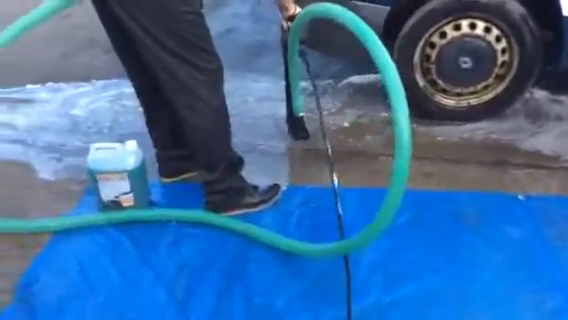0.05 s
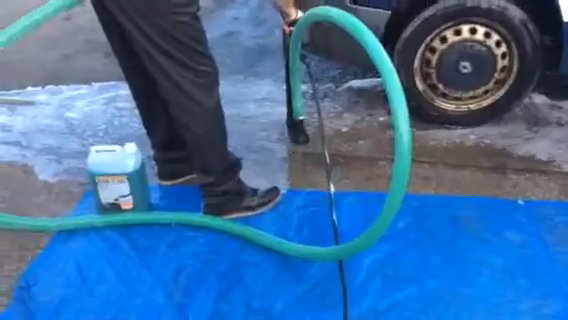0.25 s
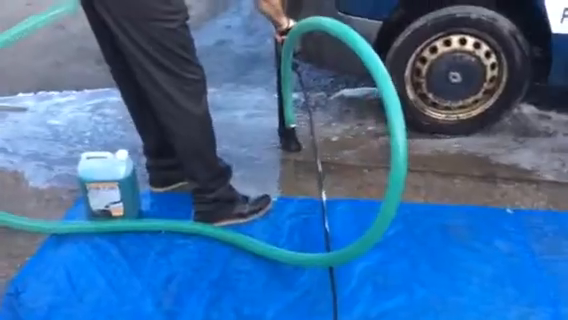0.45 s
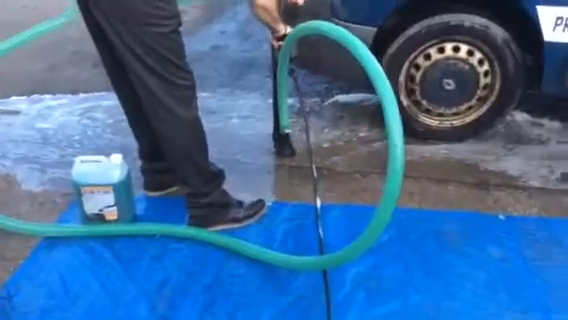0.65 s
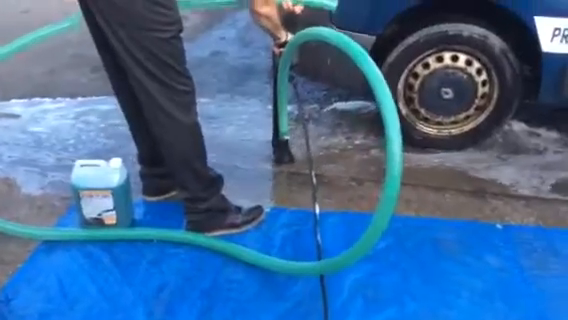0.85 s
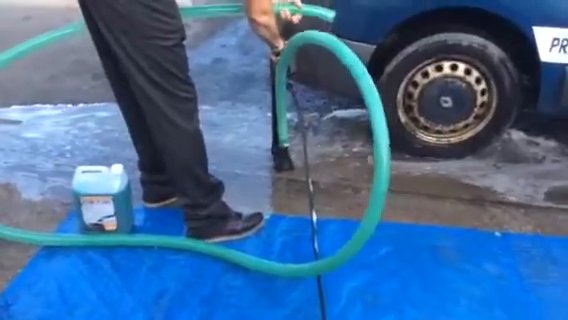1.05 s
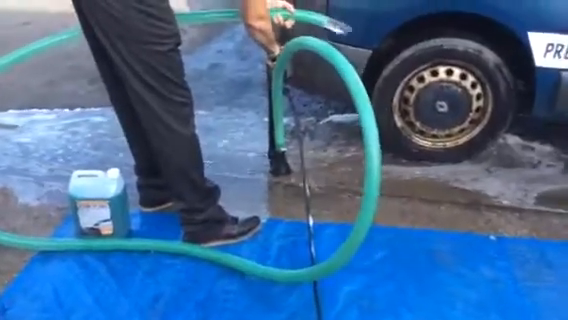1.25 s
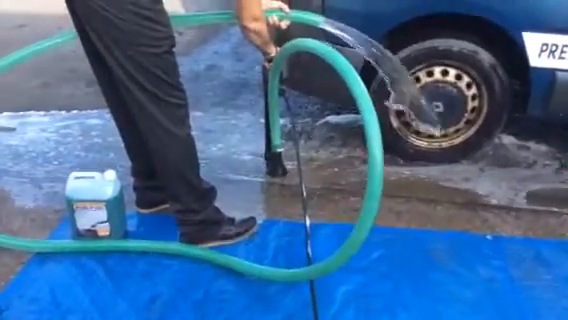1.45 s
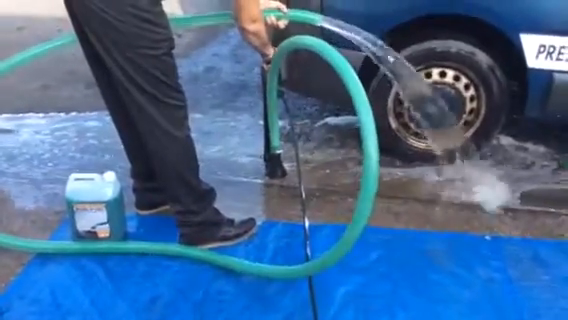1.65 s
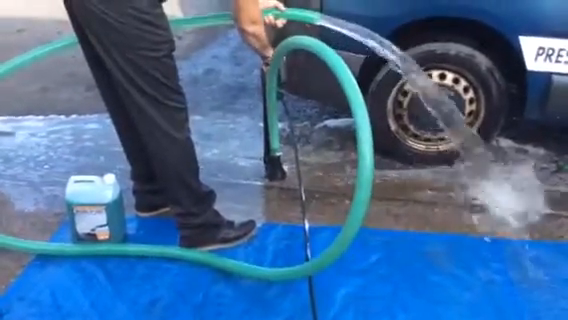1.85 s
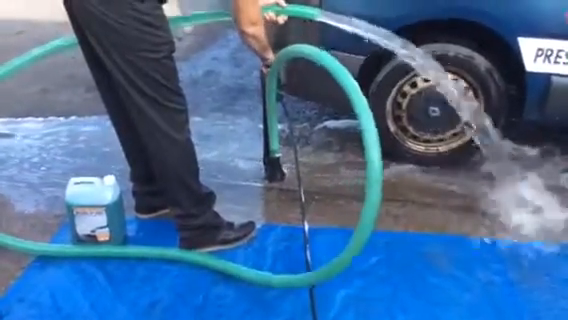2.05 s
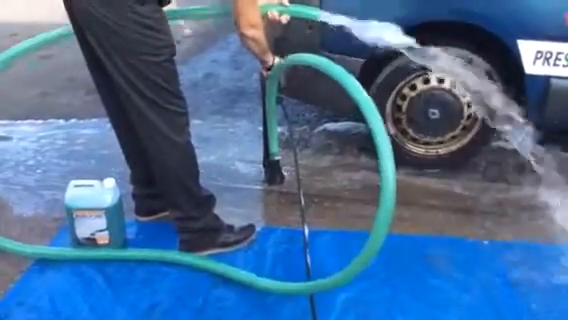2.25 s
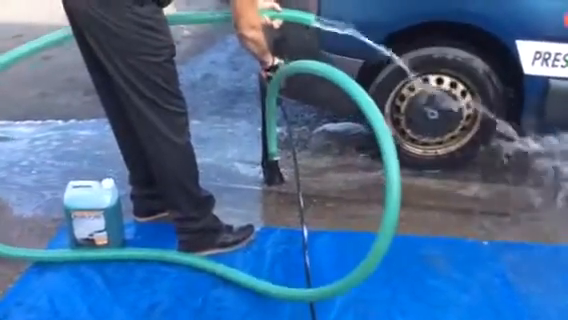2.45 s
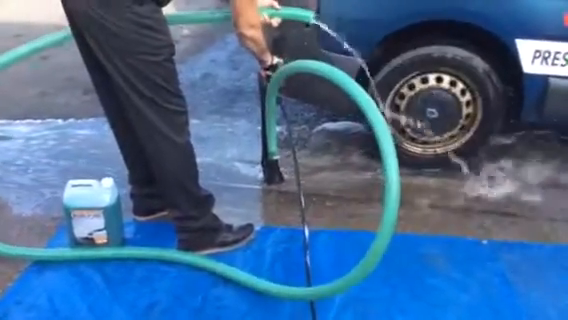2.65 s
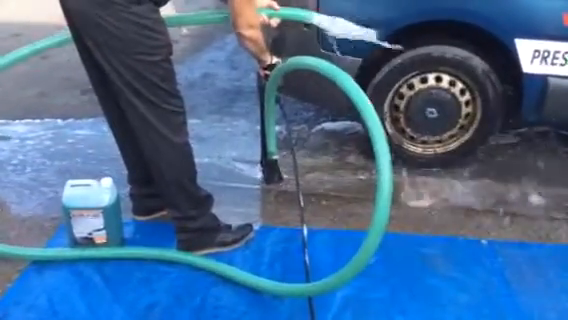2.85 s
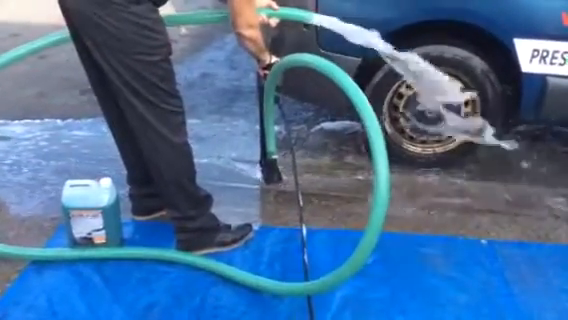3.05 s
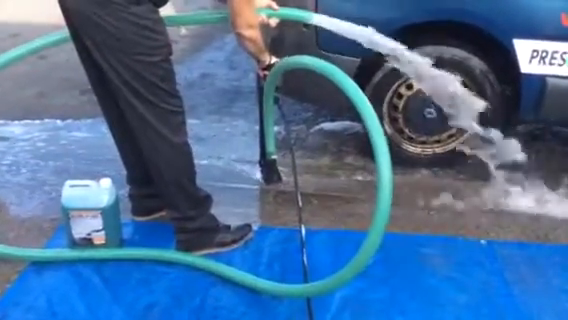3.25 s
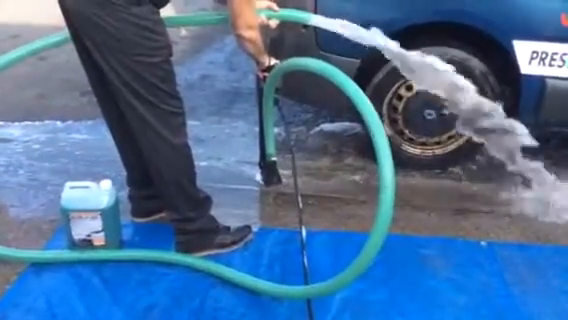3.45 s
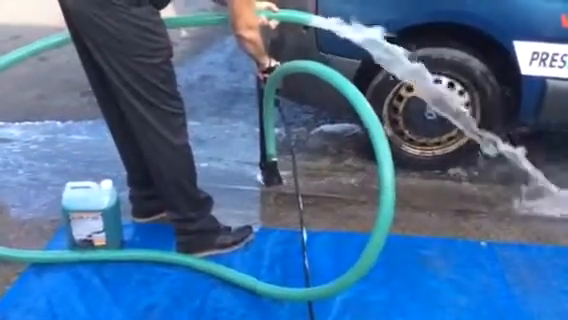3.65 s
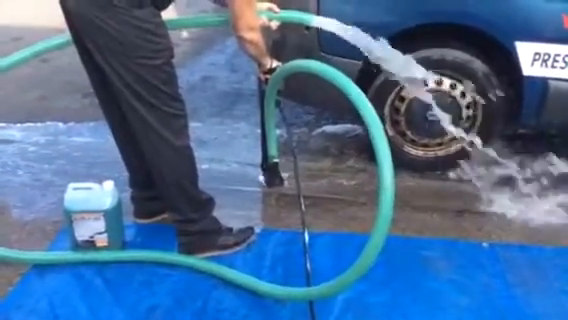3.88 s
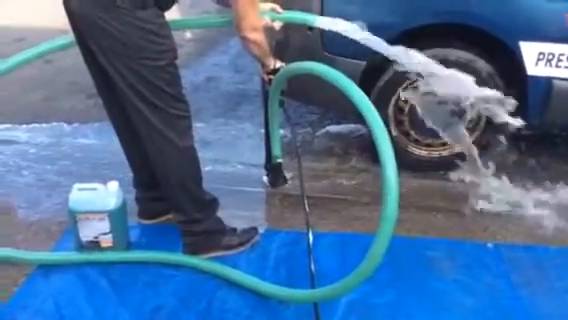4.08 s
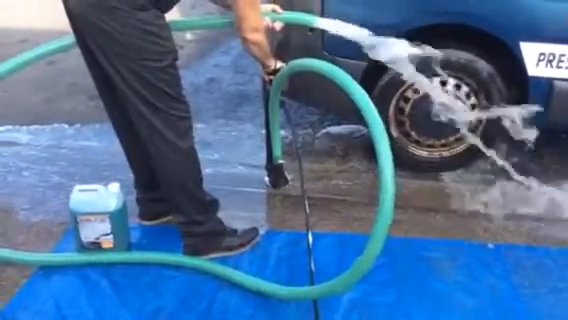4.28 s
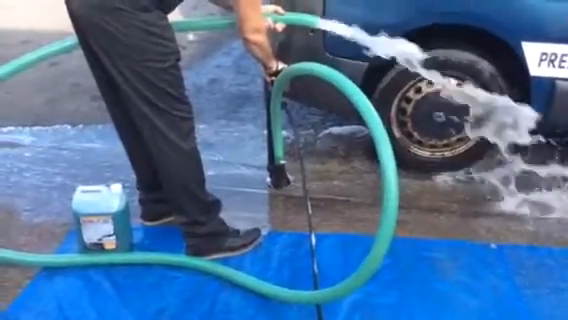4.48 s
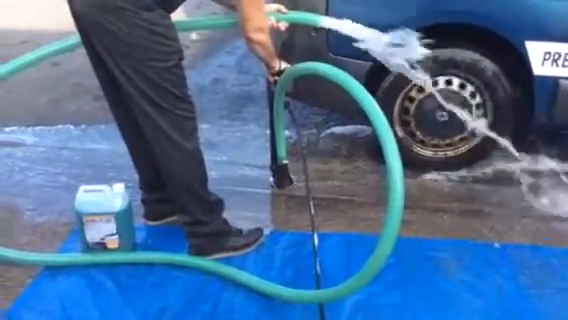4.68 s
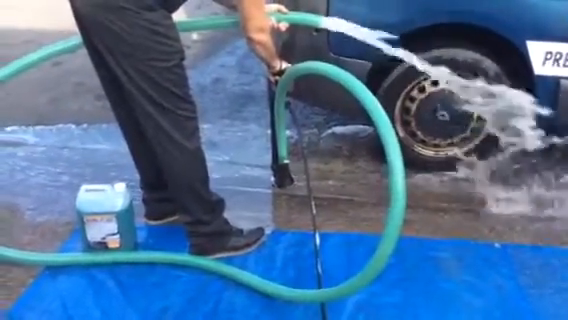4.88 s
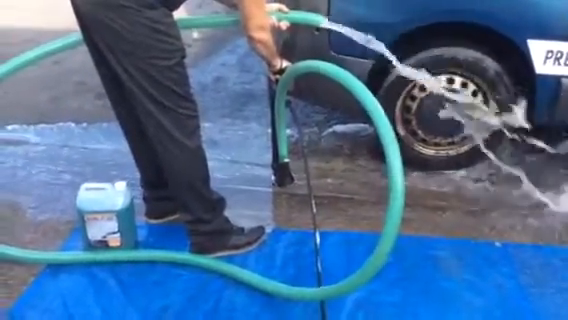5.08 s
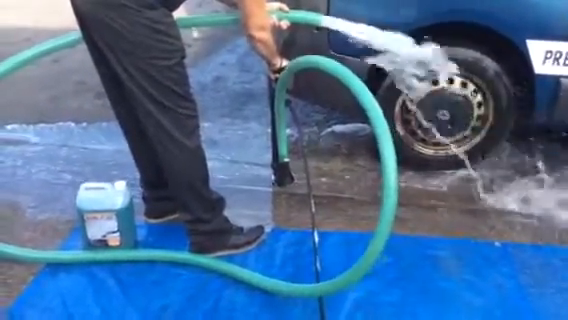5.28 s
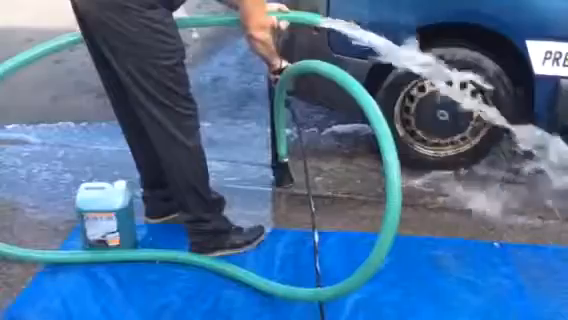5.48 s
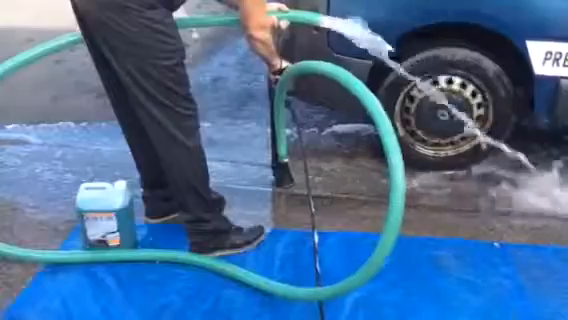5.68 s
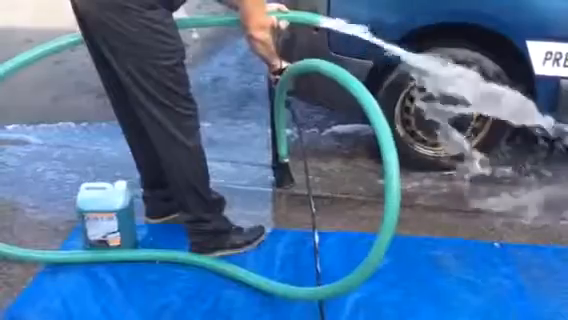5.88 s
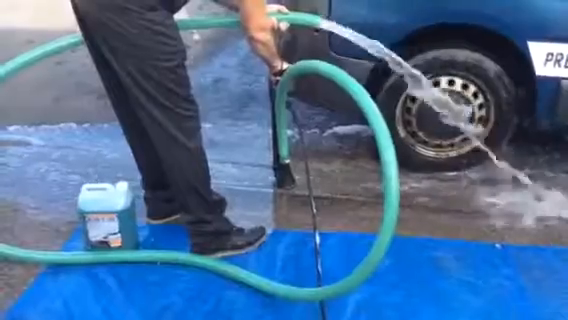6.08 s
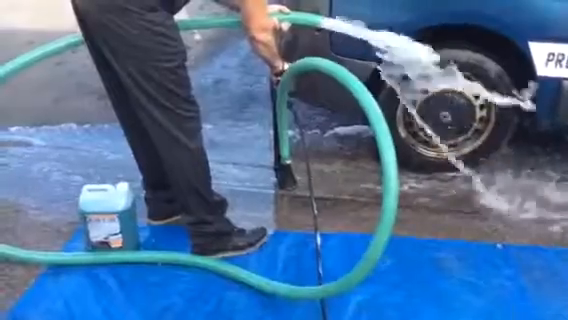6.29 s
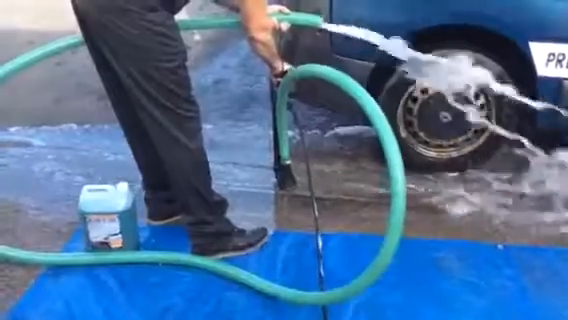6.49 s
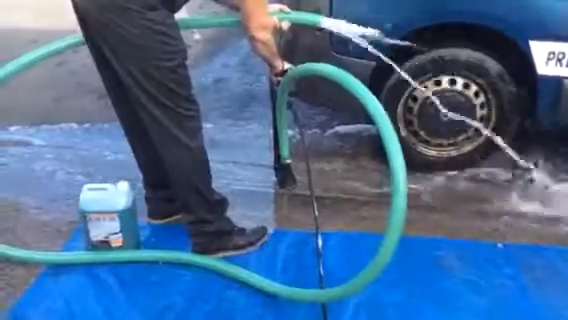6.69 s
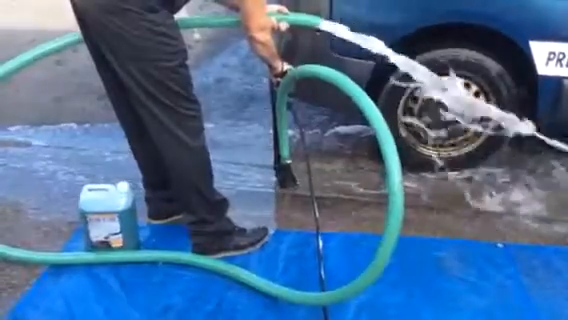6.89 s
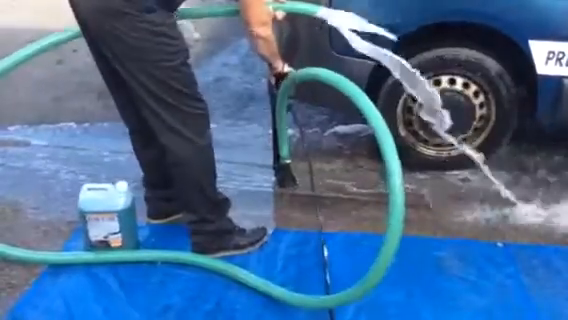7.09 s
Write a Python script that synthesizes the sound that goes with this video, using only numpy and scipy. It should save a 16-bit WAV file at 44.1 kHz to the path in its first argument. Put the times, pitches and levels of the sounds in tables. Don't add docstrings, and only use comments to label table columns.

```python
import sys
import numpy as np
from scipy import signal
from scipy.fft import rfft, irfft
from scipy.io import wavfile
from scipy.ndimage import uniform_filter1d

SR = 44100
rng = np.random.default_rng(int(sys.argv[2]) if len(sys.argv) > 2 else 0)


def wav_record(signal):
    frames = np.transpose(np.atleast_2d(signal))
    bounded = np.clip(frames, -1, 1)
    quanta = np.round(bounded * 32767).astype(np.int16)
    wavfile.write(sys.argv[1], SR, quanta)


def boost_factor(decibels):
    exponent = np.asarray(decibels, float) / 20
    return 10 ** exponent


N = 314433

# f/Hz, level/dB
RUMBLE_SPECTRUM = [(22, -30), (36, -23), (50, -1.5), (81, -3), (152, 0), (260, -1.5), (400, -7), (600, -21)]
# t/s, level/dB, f/Hz, t60/s
KNOCKS = [
    (0.06, -48, 204, 0.36),
    (.12, -49, 116, 0.23),
    (.36, -48, 200, .15),
    (.40, -47, 111, 0.14),
    (0.681, -40, 148, 0.08),
    (0.899, -35.5, 283, 0.075),
]
# multiple of shaft speed, level/dB
PUMP_ORDERS = [(10, -56.5), (11, -51.5), (13, -43.5), (14, -47), (15, -50.5), (16, -53.5), (17, -43.5),
               (21, -50), (23, -60), (25, -58), (28, -52), (29, -46), (31, -42), (32, -48), (33, -50),
               (34, -45.5), (40, -50), (41, -53), (42, -50), (43, -44.5), (46, -46.5), (49, -47), (52, -49),
               (55, -53), (58, -51), (62, -53.5), (78, -55), (83, -54.5), (84, -60), (88, -56.5)]
# f/Hz, level/dB
CASING_SPECTRUM = [(200, -70), (450, -72), (800, -65), (1500, -81), (2800, -63), (3200, -65), (4200, -78.5),
                   (6000, -60), (9000, -98)]
VALVE_DB = [2, 6.4, 1.6, 5.1, 7.6, 5.3]
# f/Hz, level/dB per Hz
HISS_SPECTRUM = [(300, -2.5), (430, -16.5), (620, -1.5), (1100, -6), (1500, -0.5), (2500, -2), (3200, -5),
                 (4300, -3.5), (5500, -6), (7500, -10.5), (9800, -6.5), (12000, -10), (13500, -5),
                 (16000, -5.5)]
# f/Hz, width/Hz, level/dB
MOUTH_MODES = [(743, 550, -2.5), (1250, 470, -2), (1600, 120, -4)]
# f/Hz, width/Hz, level/dB
PUDDLE_MODES = [(2134, 290, 7), (2800, 750, 0.5), (3570, 310, -9)]
# f/Hz, level/dB
SPRAY_SPECTRUM = [(3500, -5), (4300, 2), (4900, -1.5), (5600, 5), (6400, -5.5), (7500, -8)]
# f/Hz, level/dB
MIST_SPECTRUM = [(6000, -2), (7000, 3), (8500, 0), (10500, -3), (13000, -3.5), (16000, -2)]
# t/s, flow/dB, froth/dB
COUGH = [
    (0.76, -57, -9),
    (0.832, -51, -3),
    (0.876, -31, -1.5),
    (0.92, -26.5, -24),
    (0.952, -40, -15),
    (0.97, -54, -11),
]
# t/s, flow/dB, froth/dB
STREAM = [(1.08, -46, -18), (1.15, -35, 1.5), (1.27, -37, -16), (1.5, -36, -7.5), (1.8, -32.5, -6),
          (2.1, -32, -7.5), (2.4, -28.5, -8.5), (2.6, -33, -0.5), (2.72, -38, -2), (3.1, -34.5, -6),
          (3.6, -32.5, -4), (4.3, -31.5, -8), (4.75, -29.5, -6.5), (5.0, -33.5, -5), (5.65, -31.5, -5),
          (5.92, -35, -4.5), (6.45, -30, -5), (7.05, -33, -6)]
# t/s, level/dB, length/ms
PUDDLE_POPS = [(.893, -17, 7.6), (0.915, -17.5, 8.1), (1.17, -20, 7.4), (1.226, -20.5, 7.7),
               (4.158, -22, 5.6), (1.447, -24.5, 6.5), (1.588, -26, 14), (2.098, -27.5, 13),
               (2.847, -17.5, 3.5), (2.96, -23.5, 6.3), (3.242, -14, 5.7), (3.479, -22.5, 6.8),
               (2.81, -23, 5.8), (3.733, -27, 8), (3.844, -18, 6.3), (4.058, -13, 2.9), (4.193, -23, 7.5),
               (4.232, -24, 8.1), (4.459, -20, 8.8), (4.678, -18, 7.4), (5.063, -19, 6.5),
               (5.153, -17, 5.4), (5.315, -15, 5.4), (5.452, -23, 10), (5.785, -25, 7.1), (6.207, -26, 42),
               (6.281, -21, 5), (6.359, -15, 8.1), (4.272, -32, 22), (6.658, -21.5, 16)]
# t/s, level/dB, f/Hz
MOUTH_GULPS = [(.812, -28.5, 1250), (.832, -24, 757), (1.164, -20.5, 1234), (1.17, -23.5, 856),
               (1.21, -29.5, 850), (1.703, -28, 1480), (1.736, -21.5, 2005), (1.765, -24.5, 1186),
               (1.965, -17.5, 1750), (1.979, -14.5, 1452), (2.043, -27.5, 824), (2.165, -26.5, 1440),
               (6.215, -23, 1500), (2.327, -30.5, 1600), (2.854, -25.5, 1540), (3.053, -27, 1680),
               (3.1, -18.5, 1994), (3.505, -26, 1215), (3.875, -21, 1170), (4.31, -25, 1514),
               (4.351, -22.5, 1234), (4.933, -28, 1585), (2.03, -27, 2020), (5.59, -23.5, 956),
               (6.055, -26.5, 1170), (6.471, -28.5, 1060), (4.545, -28.5, 890), (5.64, -30, 1080),
               (6.912, -25.5, 898), (6.978, -20.5, 2035)]
# t/s,
# level/dB, f/Hz
SPRAY_SNAPS = [(0.866, -19.5, 3930), (0.886, -20, 2690), (.909, -45, 2880), (1.225, -25, 3980),
               (1.809, -27, 4800), (1.864, -28.5, 3720), (2.454, -44, 5740), (2.739, -29, 5500),
               (2.957, -27, 5660), (3.102, -24.5, 4140), (3.2, -28, 5684), (3.384, -27, 5400),
               (4.724, -29, 4100), (3.623, -30, 4060), (3.893, -22.5, 2740), (4.516, -37, 7700),
               (4.627, -27, 3360), (4.672, -31, 5800), (4.716, -18, 3130), (4.832, -25, 5560),
               (5.059, -27, 4980), (5.321, -20.5, 3580), (5.61, -31, 4380), (6.152, -27, 5650),
               (6.421, -23.5, 2800), (6.235, -21, 4320), (6.656, -30, 4800), (6.76, -26, 2790),
               (6.928, -20, 2470), (7.089, -20, 3875)]

SHAFT_HZ = 47.305
PUDDLE_HZ = 2212
FADE_S, FADE_DB, FADE_FALL_S = 7.1, 8, 0.033


def rms_one(x):
    return x / np.sqrt(np.mean(x ** 2) + 1e-20)


def at_hz(points, hz):
    table_hz, table_db = np.array(points).T
    return np.interp(np.log(hz), np.log(table_hz), table_db)


def drift(rate_hz):
    r = np.exp(-16 * np.pi * min(rate_hz, 800) / SR)
    slow = signal.lfilter([1], [1, -2 * r, r * r], rng.standard_normal(N // 8 + 4002))[4000:]
    return np.interp(np.arange(N) / 8, np.arange(len(slow)), rms_one(slow))


def coloured(x, spectrum):
    hz = np.arange(N // 2 + 1) * SR / N + 1
    gain = boost_factor(at_hz(spectrum, hz)) * (hz > spectrum[0][0]) * (hz < spectrum[-1][0])
    return rms_one(irfft(rfft(x) * gain, N))


def highpass(x, hz):
    return signal.sosfilt(signal.butter(2, hz, "high", fs=SR, output="sos"), x)


def resonate(x, hz, width_hz):
    r = np.exp(-np.pi * width_hz / SR)
    poles = [1, -2 * r * np.cos(2 * np.pi * hz / SR), r * r]
    return signal.lfilter(np.array([1, 0, -1]) * (1 - r * r) / 2, poles, x)


def rumble():
    gust_db = drift(5)
    return boost_factor(-48.5 + gust_db) * coloured(rng.standard_normal(N), RUMBLE_SPECTRUM)


def knocks():
    out, t = np.zeros(N), np.arange(N // 8) / SR
    for s, db, hz, t60_s in KNOCKS:
        at = round(s * SR)
        envelope = boost_factor(db + 12.0 - 60 * t / t60_s) * (1 - np.exp(-t / 0.014))
        out[at:at + len(t)] += envelope * np.sin(2 * np.pi * hz * t)
    return out


def pump_buzz(turns):
    orders = np.arange(4, 190)
    level_db = at_hz(CASING_SPECTRUM, orders * SHAFT_HZ) + 2.2 * rng.standard_normal(len(orders))
    for order, db in PUMP_ORDERS:
        level_db[orders == round(order)] = db
    out, size = 0, 4096
    cycle = np.arange(size) / size
    rattle = rng.standard_normal(size) * np.exp(-(3 * cycle % 1) / .7) * boost_factor(-8 * cycle)
    lines = boost_factor(level_db) * np.exp(1j * np.angle(rfft(rattle)[orders]))
    for group in range(3):
        spectrum = np.zeros(size // 2 + 1, complex)
        spectrum[orders[group::3]] = lines[group::3]
        wave = irfft(spectrum, size) * size / np.sqrt(2)
        out = out + np.interp(turns % 1, cycle, wave, period=1) * boost_factor(.5 * drift(2.5))
    return out


def machine_hiss(turns):
    stroke = 6 * turns - .45
    since = stroke % 1
    stroke_gain = boost_factor(np.array(VALVE_DB)[stroke.astype(int) % 6])
    puff = stroke_gain * (1 - np.exp(-since / 0.064)) * np.exp(-since / 0.43)
    hiss = coloured(rng.standard_normal(N), HISS_SPECTRUM)
    top = highpass(hiss, 7000)
    puffed = (hiss - top) * (0.68 + .5 * puff) + top * (0.6 + 1.51 * puff)
    return boost_factor(-36) * puffed * boost_factor(0.46 * drift(18))


def washer():
    turns = SHAFT_HZ * np.arange(N) / SR + .002 * drift(.7)
    return pump_buzz(turns) + machine_hiss(turns)


def droplets(per_s, spread_db, clump_db, clump_hz):
    sizes = boost_factor(spread_db * np.minimum(rng.exponential(1, N), 5)) * rng.choice([-1, 1], N)
    return sizes * (rng.random(N) < per_s / SR) * boost_factor(clump_db * drift(clump_hz))


def landings(per_s, spread_db, decay_s):
    r = np.exp(-1 / (decay_s * SR))
    hits = boost_factor(spread_db * rng.standard_normal(N)) * (rng.random(N) < per_s / SR)
    draining = signal.lfilter([1], [1, -r], hits)
    level = np.log(.3 + signal.lfilter([.03], [1, -.97], draining))
    return rms_one(np.tanh(.6 * rms_one(level - level.mean())))


def slugs(rows):
    kicks = np.zeros(N)
    for s, db, hz, _ in rows:
        kicks[round(s * SR) - 60] += boost_factor(0.5 * (db + 29.5)) * (hz / 2200) ** 1.03
    drain = np.exp(-1 / (0.022 * SR))
    draining = signal.lfilter([1], [1, -drain], kicks + 1e-18)
    flow = signal.lfilter([.02], [1, -.98], draining)
    return 2.5 * np.tanh(flow / 2.5)


def stream_course():
    s, flow_db, froth_db = np.transpose(COUGH + STREAM)
    t, lead_s = np.arange(N) / SR, 0.042
    fade = np.clip((t - FADE_S) / FADE_FALL_S, 0, 1)
    landing_db = np.interp(t, s, flow_db + 32, left=-60) - FADE_DB * fade
    mouth_db = np.interp(t + lead_s, s, flow_db + 32, left=-90) - 20 * (t > FADE_S - lead_s)
    return landing_db, np.interp(t, s, froth_db + 8), mouth_db


def gurgle():
    ringing = sum(boost_factor(db) * resonate(droplets(1100, 2.0, 2.5, 25), hz, w) for hz, w, db in MOUTH_MODES)
    return rms_one(highpass(ringing, 480))


def splash():
    return rms_one(sum(boost_factor(db) * resonate(droplets(1500, 2.0, 2.4, 27), hz, w) for hz, w, db in PUDDLE_MODES))


def plinks(per_s):
    hits, dealt = np.abs(droplets(per_s, 2.6, 1.2, 12)), rng.integers(0, 14, N)
    pitches, grit, out = np.geomspace(800, 6000, 14), rng.standard_normal(N), 0
    for k, hz in enumerate(pitches):
        puffs = signal.lfilter([1], [1, -1.97, .985 ** 2], hits * (dealt == k) + 1e-18)
        ringing = resonate(puffs * np.roll(grit, 999 * k), hz, 0.11 * hz)
        out = out + boost_factor(-5 * np.log2(hz / 2200) ** 2) * rms_one(ringing)
    return rms_one(out)


def gush(rows):
    flow_db, froth_db, mouth_db = stream_course()
    surge, slug = landings(90, 3.0, .008), slugs(rows)
    spray = coloured(droplets(9000, 3.0, 2.0, 40), SPRAY_SPECTRUM)
    mist = coloured(droplets(12000, 3.0, 2.2, 40), MIST_SPECTRUM)
    gurgle_gain = boost_factor(-35 + 0.53 * mouth_db + 2.05 * surge) * (1 + 0.11 * slug)
    splash_gain = boost_factor(-36.5 + flow_db + 3.8 * surge) * (1 + 0.57 * slug)
    plink_gain = boost_factor(-37 + flow_db)
    spray_gain = boost_factor(-43 + flow_db + froth_db + 3.1 * surge) * (1 + 0.5 * slug)
    mist_db = -43.5 + flow_db + 0.99 * froth_db + 2.2 * surge + 1.3 * drift(25)
    mist_gain = boost_factor(mist_db) * (1 + 0.5 * slug)
    return (gurgle_gain * gurgle() + splash_gain * splash() + plink_gain * plinks(150)
            + spray_gain * spray + mist_gain * mist)


def pockets():
    scatter = 0.0071 * rng.standard_normal(len(PUDDLE_POPS))
    pops = [(s, db, PUDDLE_HZ * (1 + d), ms / 1000) for (s, db, ms), d in zip(PUDDLE_POPS, scatter)]
    gulps = [(s, db, hz, 0.0101) for s, db, hz in MOUTH_GULPS]
    snaps = [(s, db, hz, 0.0066) for s, db, hz in SPRAY_SNAPS]
    return pops + gulps + snaps


def small_pops():
    count, from_s, level_db, spread_db, length_s = 110, 1.3, -33, 2, 0.0065
    when, size, pitch = rng.random((count, 3)).T
    hz = PUDDLE_HZ * np.where(pitch < .6, .95 + .15 * pitch, 2.2 - 1.8 * pitch)
    s = from_s + when * (FADE_S - from_s - .05)
    db = level_db + 2 * spread_db * (size - .5)
    return [(a, b, c, length_s) for a, b, c in zip(s, db, hz)]


def bursts(rows):
    out, draws = np.zeros(N + 4000), rng.standard_normal((len(rows), 3, 4000))
    t = np.arange(4000) / SR
    for (s, db, hz, length_s), (a, b, c) in zip(rows, draws):
        rise = 1 - np.exp(-(t / (0.00097 + 0.19 * length_s)) ** 2)
        shape = rise * np.exp(-(t / (0.76 * length_s)) ** 1.15)
        edge_hz = np.clip(140 + 0.061 * hz, 30, 2000)
        waver = signal.lfilter(*signal.butter(2, edge_hz, fs=SR), a + 1j * b)
        rough = 1.48 + rms_one(waver.view(float)).view(complex)
        tone = np.real(rough * np.exp(2j * np.pi * hz * (1.03 * t - 2.65 * t * t))) * shape
        tone /= np.sqrt(np.sum(tone ** 2) / np.sum(shape ** 2))
        slap = signal.lfilter([.5, 0, -.5], [1, -.6], c) * boost_factor(-15 + 7.6 * np.log2(hz / 2200))
        slap = slap * np.exp(-t / (0.25 * length_s)) * np.minimum(t / 0.00051, 1)
        at = round(s * SR)
        out[at:at + 4000] += boost_factor(db + 6.5) * (tone + slap)
    return out[:N]


def yard(x):
    dull = signal.lfilter([.4], [1, -.6], x)
    echoes = [(.0037, -5), (.0083, -7), (.017, -45), (.031, -19)]  # t/s, level/dB
    return x + sum(boost_factor(db) * np.roll(dull, round(s * SR)) for s, db in echoes)


def water():
    rows = pockets()
    return yard(bursts(rows + small_pops())) + gush(rows)


def scene():
    return (rumble() + knocks() + washer() + water())[None]


def roll_off(x):
    return signal.sosfilt(signal.butter(12, 16620, fs=SR, output="sos"), x)


def record(dry):
    level_db = 10 * np.log10(uniform_filter1d(dry[0] ** 2, 1300) + 1e-12)
    ramp_db = 14 * np.arange(N) / SR
    held_db = np.maximum.accumulate(np.maximum(level_db + 26, 0) + ramp_db) - ramp_db
    duck_db = signal.lfilter([.002], [1, -.998], held_db)
    rounded = np.tanh(1.647 * dry * boost_factor(-.32 * duck_db)) / 1.555
    cut = signal.ellip(14, .3, 90, 15320, fs=SR, output="sos")
    return roll_off(signal.sosfilt(cut, rounded))


dry = scene()
out = record(dry)
wav_record(out)
```